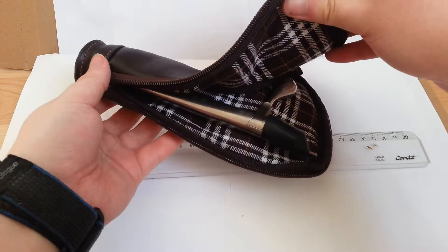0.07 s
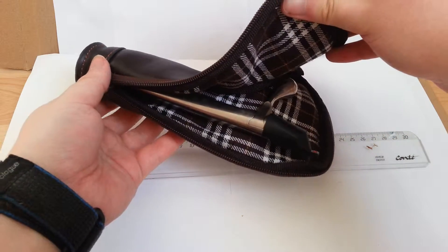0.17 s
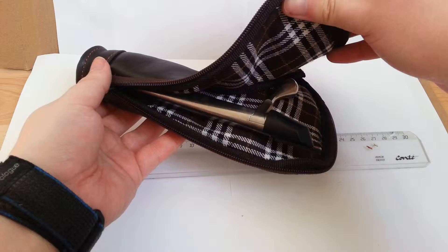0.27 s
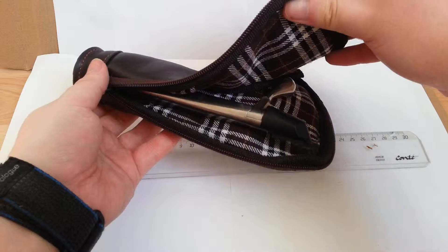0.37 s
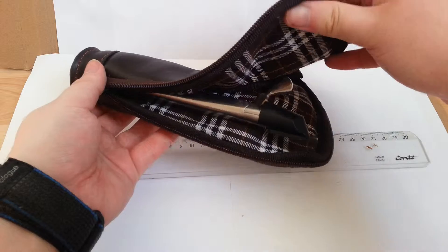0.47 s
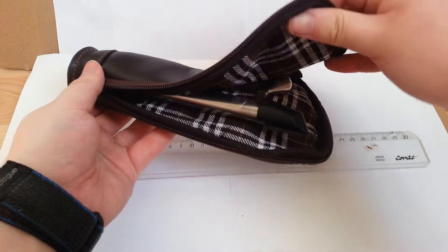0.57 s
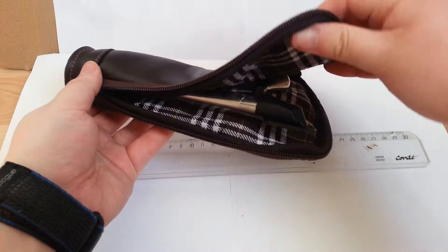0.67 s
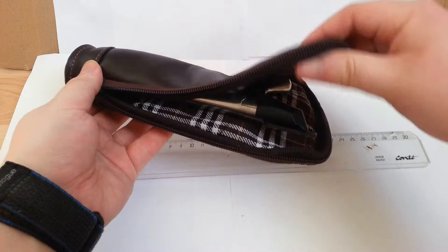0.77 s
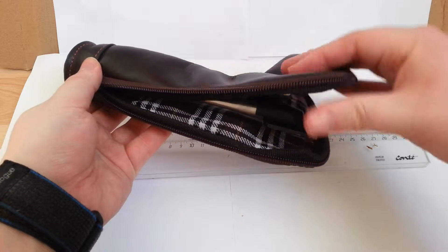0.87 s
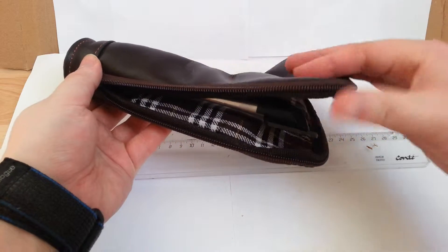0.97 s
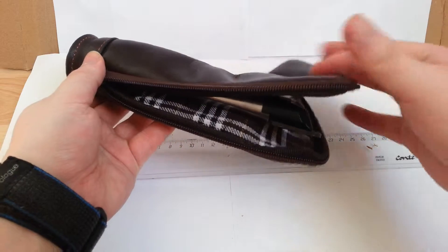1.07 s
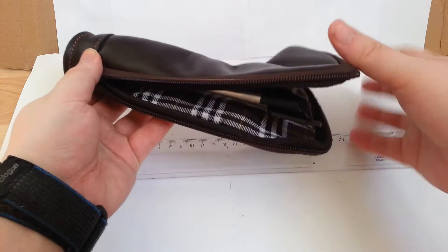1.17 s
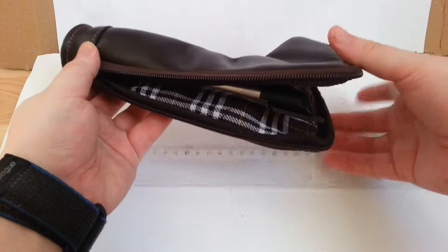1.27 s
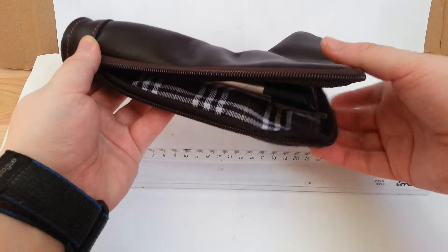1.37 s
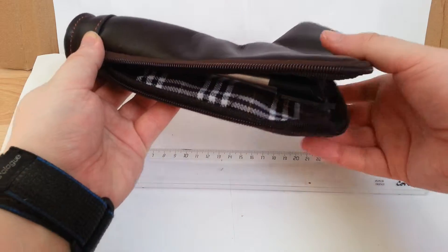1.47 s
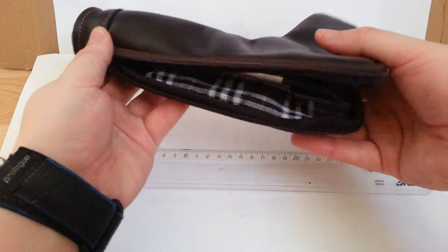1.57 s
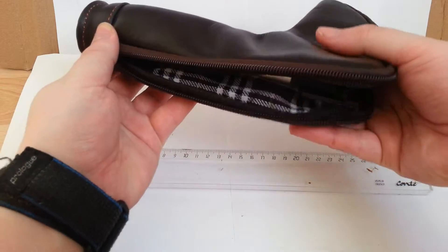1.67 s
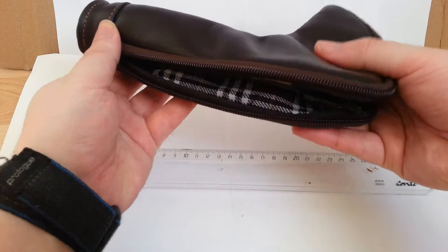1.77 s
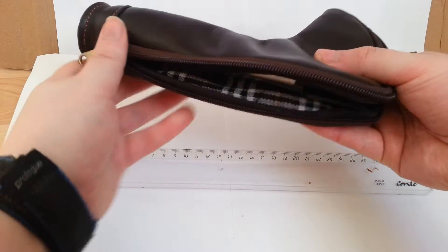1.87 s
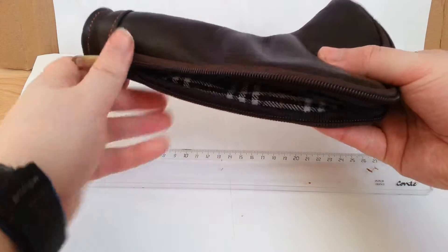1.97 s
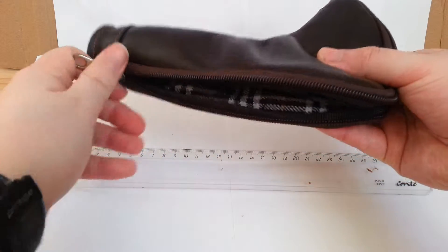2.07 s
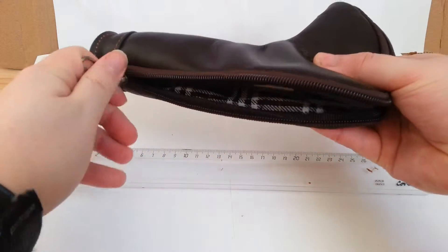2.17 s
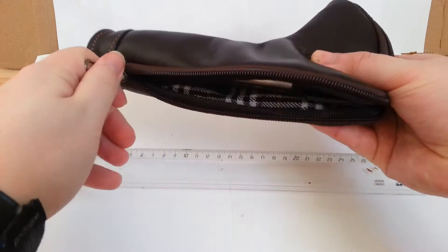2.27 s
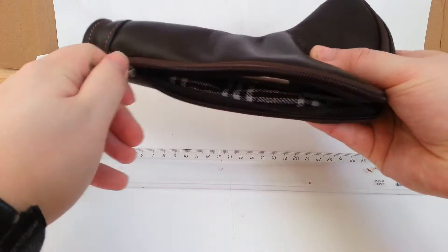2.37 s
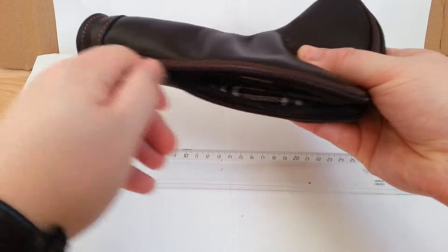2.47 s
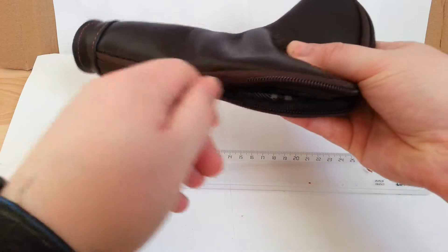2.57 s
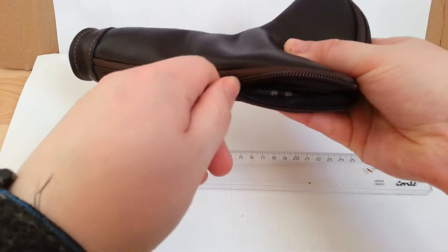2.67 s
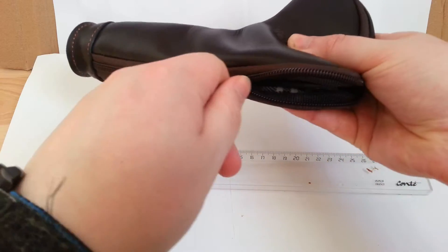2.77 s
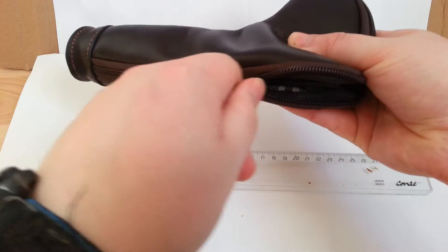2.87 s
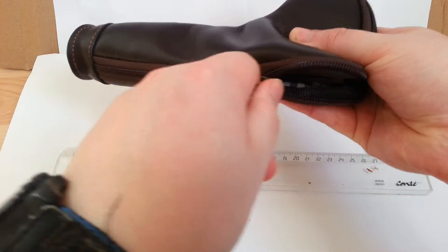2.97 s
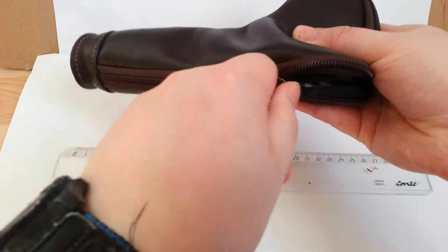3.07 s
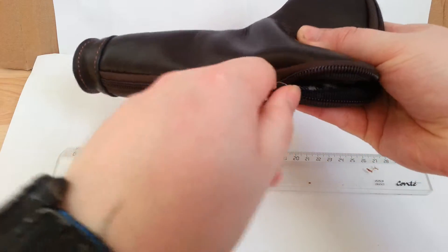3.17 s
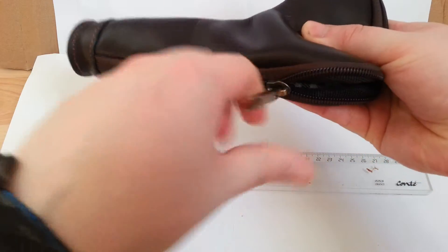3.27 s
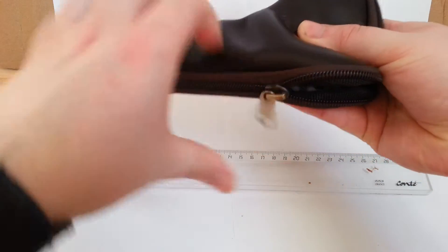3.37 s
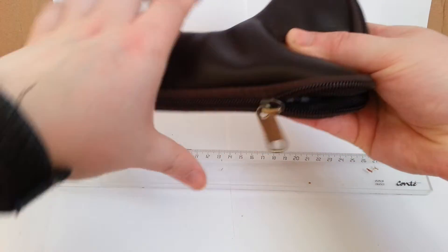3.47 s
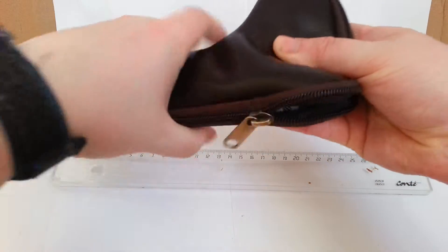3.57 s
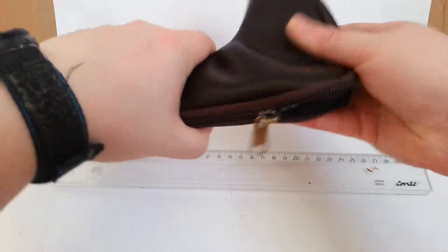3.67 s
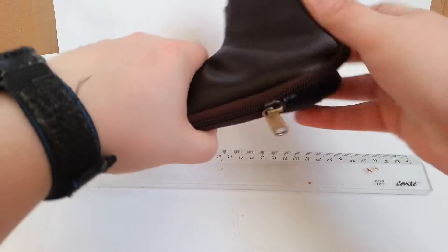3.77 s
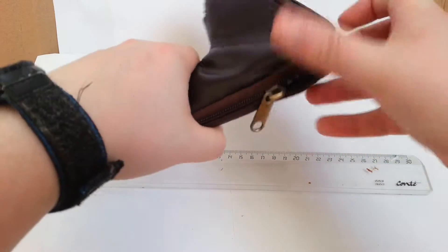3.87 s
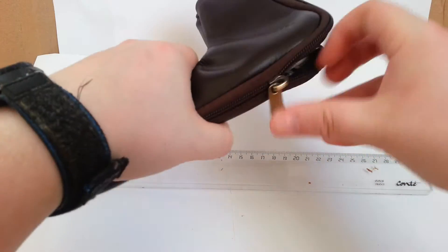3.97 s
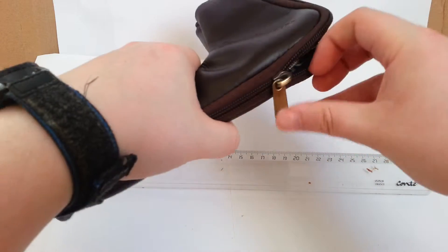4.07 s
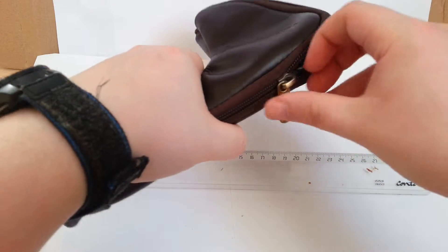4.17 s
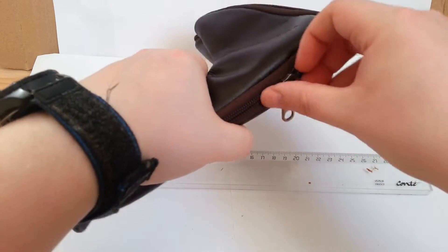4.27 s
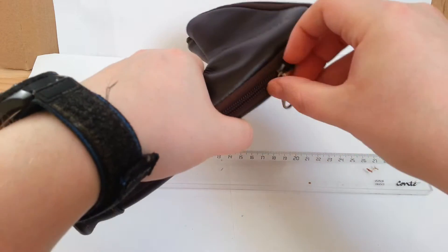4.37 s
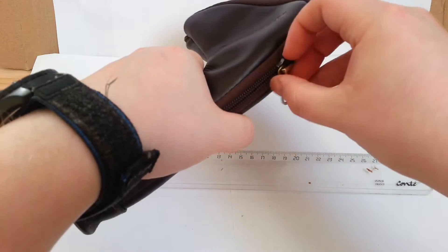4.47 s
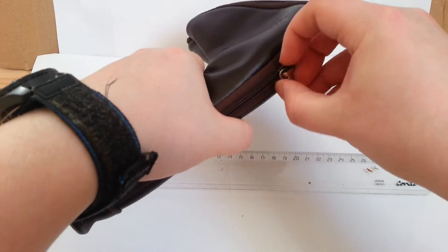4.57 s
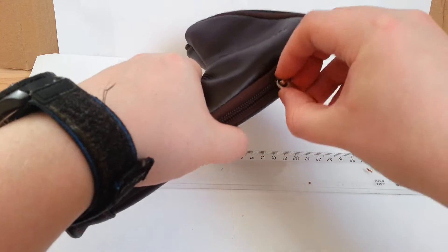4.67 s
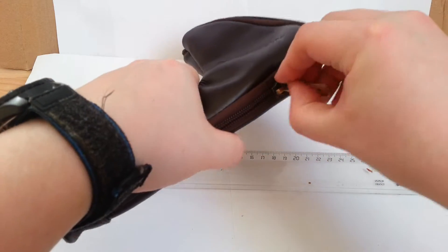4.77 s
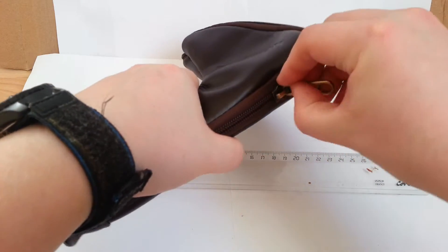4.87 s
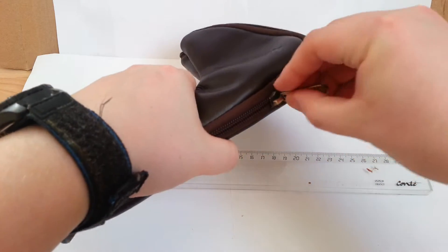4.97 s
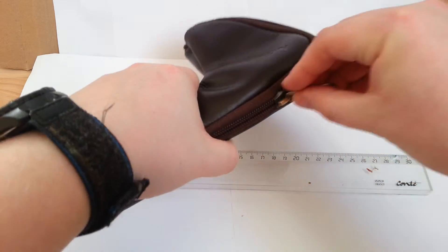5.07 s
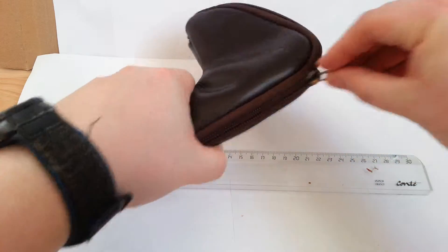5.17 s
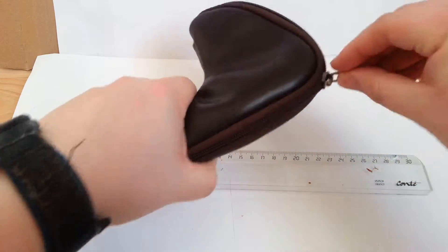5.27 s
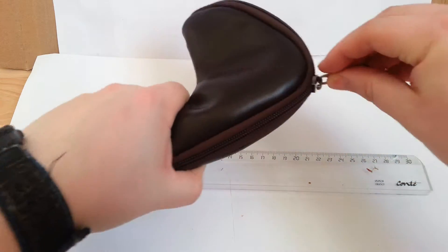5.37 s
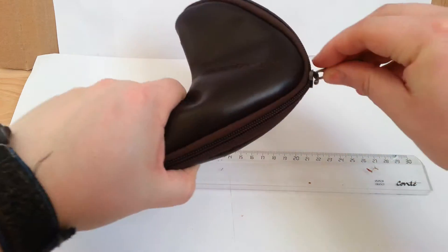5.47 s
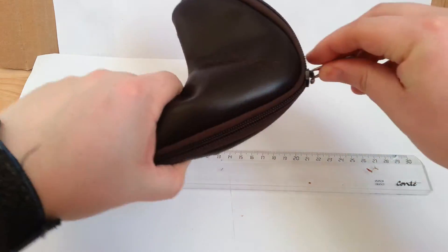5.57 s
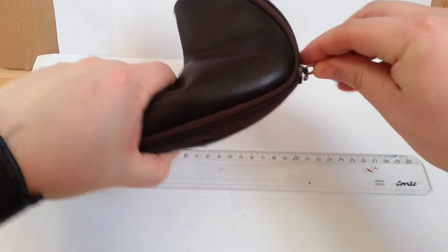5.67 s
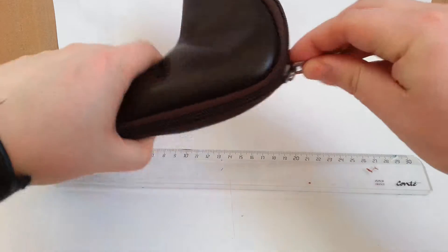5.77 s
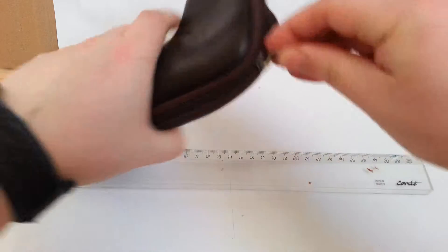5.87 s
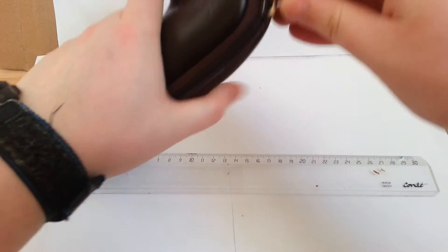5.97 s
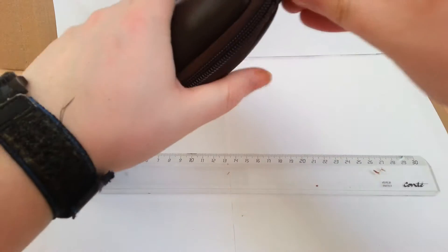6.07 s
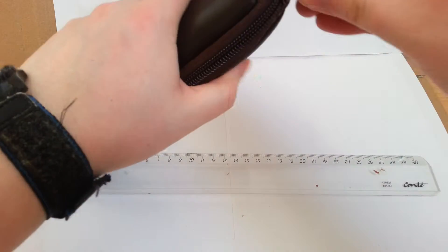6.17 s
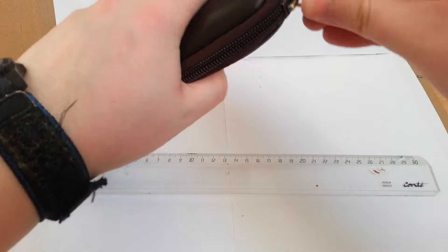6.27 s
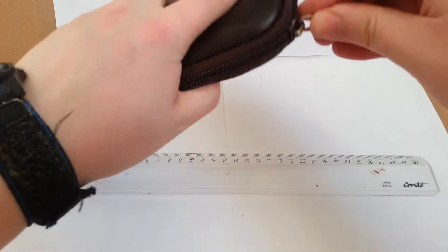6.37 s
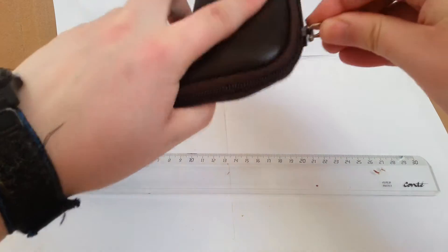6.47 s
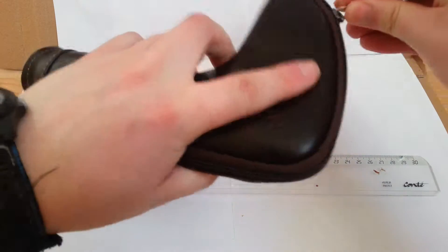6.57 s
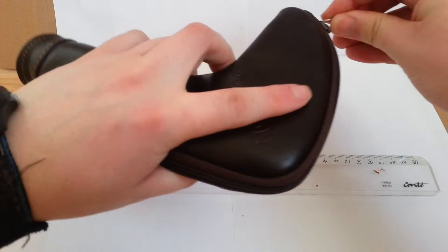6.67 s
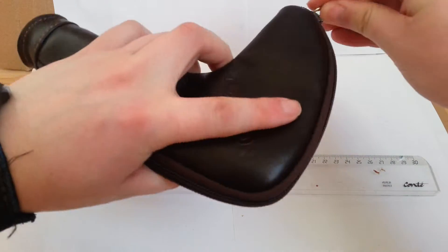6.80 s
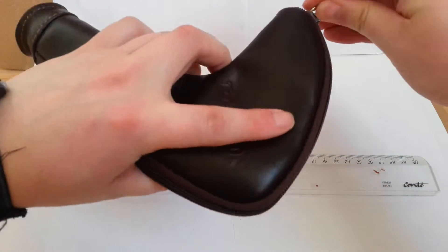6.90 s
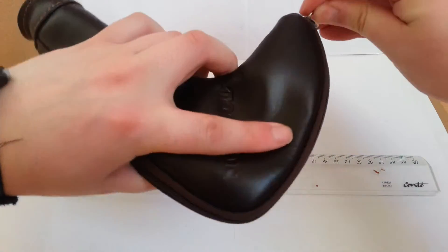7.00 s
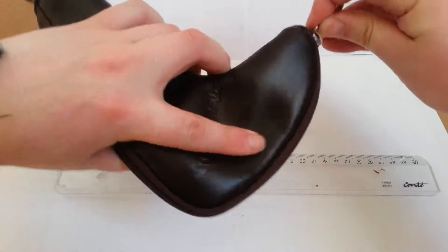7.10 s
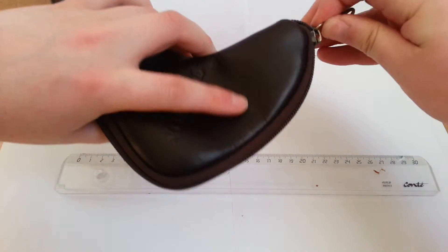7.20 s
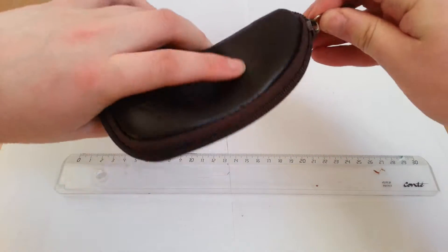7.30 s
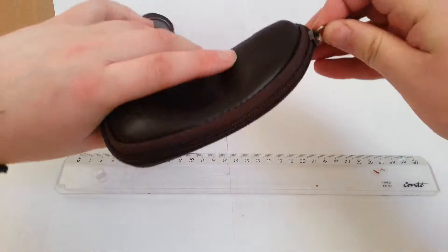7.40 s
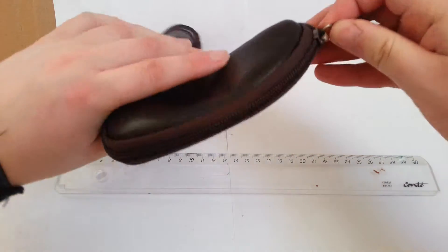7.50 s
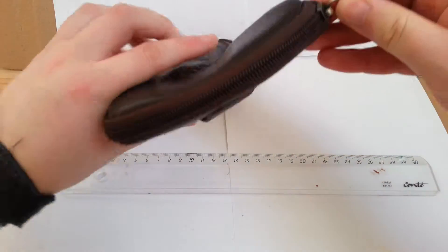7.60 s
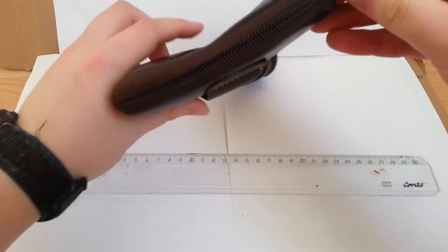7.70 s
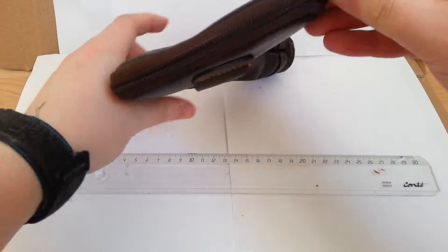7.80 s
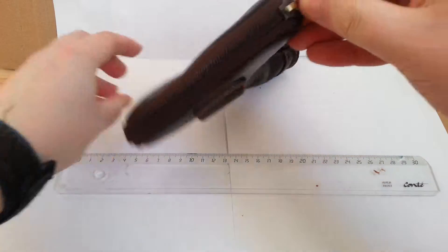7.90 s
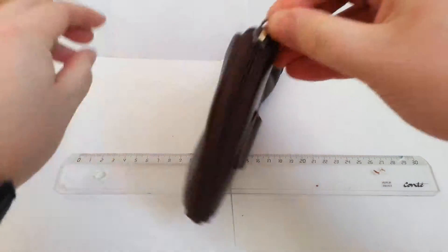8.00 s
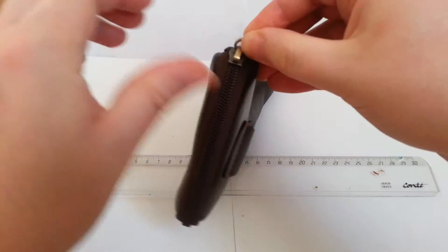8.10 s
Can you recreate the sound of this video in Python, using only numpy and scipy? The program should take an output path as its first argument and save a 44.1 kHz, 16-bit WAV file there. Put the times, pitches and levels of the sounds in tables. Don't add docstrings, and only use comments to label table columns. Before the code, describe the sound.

A zipper on a stuffed leather case is pulled shut in three quick rasping strokes, with leather rubbing, creaks and metal tab ticks between.

```python
import sys
import numpy as np
from scipy import signal
from scipy.fft import rfft, irfft, next_fast_len
from scipy.io import wavfile
from scipy.ndimage import uniform_filter1d

SR = 44100
rng = np.random.default_rng(int(sys.argv[2]) if len(sys.argv) > 2 else 0)


def volts(x):
    e = np.asarray(x, float) / 20
    return 10 ** e


def output_pcm(signal):
    pcm = np.clip(np.atleast_2d(signal).T, -1, 1) * 32767
    wavfile.write(sys.argv[1], SR, np.round(pcm).astype(np.int16))


N = 358956

# [f/Hz, density level/dB per Hz]
PORT_NOISE = [(25, -13), (50, -5), (95, 4.5), (170, 1.5), (300, -6.5), (520, -6), (1000, -10),
              (2150, -15.5), (3450, -16.5), (5200, -21.5), (6400, -25), (8600, -20.5), (12000, -19),
              (14600, -22.5)]
PORT_NOISE_DB = -61
WHINE_HZ, WHINE_DB = 11580, -83
NEAR_DB, LEAK_DB, CUTOFF_HZ = 6.0, -31, 14680

# [f/Hz, width/Hz, level/dB]
THUD = [(231, 117, -4.5), (378, 167, -6)]
RING = [(520, 60, -4), (635, 60, -3), (760, 70, -4), (860, 70, 0), (940, 80, -1), (1050, 110, 0),
        (1200, 150, 0), (1330, 120, 0), (1490, 90, -1), (1750, 65, -1.5)]
RASP = [(1974, 260, -1.5), (2550, 280, -4), (2793, 364, -5), (3373, 750, -7.5), (4260, 980, -11)]
HISS = [(4900, 770, 5.5), (7780, 7500, 1.5), (13000, 10500, -6.5)]
# [f/Hz, width/Hz, level/dB]
PAD = [(245, 204, -4), (356, 197, -3.5)]

# [t/s, ring level/dB]
HOLDING = [(0, -69), (.34, -79), (.63, -76), (1.09, -65), (1.65, -71), (1.9, -61), (2.2, -66), (2.75, -75),
           (3.3, -65), (3.87, -62), (4.1, -71), (4.78, -66), (5.1, -76), (5.45, -62), (5.67, -79),
           (7.02, -73), (7.3, -63), (7.6, -76)]
HOLD_THUD_DB, HOLD_RASP_DB, HOLD_HISS_DB = -63, -65, -68
HOLD_THUD_FOLLOWS, HOLD_RASP_FOLLOWS, HOLD_HISS_FOLLOWS = .4, .75, .4
GRIP_OCTAVES = 0.78
GRIP_FOCUS_HZ, GRIP_FOCUS_HZ_PER_DB = 880, 18
# [peak t/s, ring level/dB, 20 dB rise/s, 20 dB fall/s, rasp level/dB re ring]
RUBS = [(1.09, -67, .1, .1, 3), (1.285, -36, .06, .09, -1.5), (2.95, -49, .2, .2, -7),
        (3.055, -52, .05, .07, -3), (3.42, -44, .05, .05, -2), (1.9, -60, .08, .1, 2),
        (3.574, -53, .15, .45, -1), (4.815, -51, .012, .08, -4), (5.83, -60, .25, .05, -2),
        (5.9, -58, .1, .05, 3), (5.843, -46, .02, .15, -8), (6.29, -55, .04, .3, -1),
        (6.8, -43, .045, .15, -11), (7.834, -51, .14, .3, 2.5), (8.094, -42, .07, .06, -4)]
RUB_THUD_DB, RUB_HISS_DB, RUB_HISS_FOLLOWS = -8, -55, .75
# [peak t/s, ring level/dB, 20 dB rise/s, 20 dB fall/s, rasp level/dB re ring]
GRABS = [
    (1.258, -38.5, .011, .07, 0),
    (4.803, -46, .015, .035, -12),
    (5.929, -37.5, .008, .1, -6),
    (6.005, -52, .06, .16, 4),
    (7.632, -49, .025, .13, 1),
    (7.7, -49, .05, .15, 0),
]
GRAB_THUD_DB, GRAB_HISS_DB, GRAB_HISS_FOLLOWS = 1.5, -49, .3

# [t/s, peak level/dB, ring f/Hz]
SLIPS = [(1.24, -45, 657), (1.605, -48.5, 1060), (1.856, -45, 816), (1.898, -42, 1030),
         (1.986, -45.5, 1320), (2.039, -42, 993), (2.084, -49, 920), (2.138, -53, 905),
         (2.221, -47.5, 1180), (2.848, -38, 854), (2.878, -40.5, 896), (2.888, -45, 1270),
         (2.908, -37, 832), (2.925, -38, 890), (2.943, -38, 912), (2.952, -39, 1260), (2.96, -37, 853),
         (2.978, -39, 1410), (3.041, -46, 1250), (3.062, -49, 1250), (3.373, -44, 651), (3.401, -44, 794),
         (3.625, -48, 1250), (3.705, -46.5, 1450), (5.488, -49, 790), (5.506, -49, 1300),
         (6.267, -48, 1300), (6.371, -46.5, 580)]
SLIP_T60_S, SLIP_CRACK_DB, SLIP_DULLS, SLIP_THUMP_DB = .018, -16, .4, -19
# [t/s, peak level/dB, ring f/Hz, thump level/dB re peak]
KNOCKS = [(1.255, -29, 1150, -6), (2.807, -46.5, 1270, -4), (4.438, -46.5, 785, -4), (5.841, -36, 760, -22),
          (5.928, -28, 1700, 4), (6.775, -35, 807, -14), (6.782, -35, 832, -13), (6.789, -28.5, 780, -17),
          (6.8, -33, 1360, 1), (6.812, -36, 1450, 2), (6.826, -30.5, 860, -30), (7.238, -47.5, 830, -6),
          (7.628, -36.5, 1200, 2.5), (7.702, -51, 1530, -1)]
KNOCK_T60_S, KNOCK_CRACK_DB, KNOCK_DULLS = .017, -17, 1.3
# [t/s, peak level/dB, ring f/Hz, T60/s, crack level/dB re peak]
TAB = [(3.318, -44, 2540, .029, -3.5), (3.417, -37, 1220, .026, -8), (3.671, -40.5, 1850, .017, -7),
       (3.689, -42.5, 2040, .028, -5), (3.761, -46.5, 1810, .032, -2), (3.888, -47, 1210, .014, -3),
       (4.531, -52, 3300, .014, -8), (4.579, -46, 1600, .02, 1.5), (4.791, -45, 1300, .015, -2),
       (4.801, -38.5, 560, .011, 5), (5.547, -53, 4000, .02, -10), (5.83, -43, 2000, .02, -6),
       (5.994, -36, 4600, .014, -20), (6.003, -27, 4650, .03, -23), (6.014, -39, 4700, .1, -23),
       (7.701, -45, 5200, .04, -25), (8.028, -42, 1480, .013, -5)]
TAB_THUMP_DB = -20

# [t/s, ring level/dB, teeth rate/(1/s), ring focus f/Hz, scrape level/dB re ring]
STROKE_1 = [
    (2.366, -36, 128, 1130, -6.5),
    (2.438, -31.5, 125, 1200, -14),
    (2.458, -34, 177, 1190, -15),
    (2.48, -31, 235, 930, -10.5),
    (2.51, -39, 296, 1130, -5),
    (2.575, -33.5, 312, 1020, -7.5),
    (2.63, -38.5, 286, 1070, -8),
    (2.69, -45.5, 293, 900, -10),
    (2.73, -58, 264, 800, -7),
]
# [t/s, ring level/dB, teeth rate/(1/s), ring focus f/Hz, scrape level/dB re ring]
STROKE_2 = [
    (5.116, -70, 247, 1020, -10),
    (5.13, -52, 249, 1050, -4.5),
    (5.165, -44.5, 265, 1000, -5.5),
    (5.2, -41, 280, 560, -8),
    (5.22, -45.5, 253, 673, -4.5),
    (5.252, -47.5, 198, 820, -6),
    (5.294, -51, 195, 858, -3.5),
    (5.34, -62, 160, 817, -2),
]
# [t/s, ring level/dB, teeth rate/(1/s), ring focus f/Hz, scrape level/dB re ring]
STROKE_3 = [
    (6.447, -56, 194, 670, -3),
    (6.49, -31.5, 220, 700, -9.5),
    (6.52, -25.5, 254, 980, -11.5),
    (6.558, -21.5, 316, 1080, -18.5),
    (6.588, -23.5, 430, 1420, -15),
    (6.615, -25, 437, 1240, -20.5),
    (6.645, -33.5, 300, 1401, -19),
    (6.685, -34.5, 116, 975, -8),
    (6.752, -53, 190, 1600, -11),
]
SCRAPE_PER_DB = .015
THUD_FOLLOWS = .7
HISS_PER_OCTAVE_DB, UPPER_RASP_PER_OCTAVE_DB = 3, 3

# [t/s, lower f/Hz, lower level/dB, upper level/dB]
SLIDE = [
    (7.692, 4250, -74, -74),
    (7.703, 4250, -61, -55),
    (7.722, 4200, -65, -67),
    (7.83, 4130, -59, -68),
    (7.9, 3950, -65, -68),
    (7.96, 3880, -72, -72),
]
SLIDE_UPPER_HZ, SLIDE_WIDTH_HZ = 5180, 100


def rms_one(x):
    return x / np.sqrt(np.mean(x ** 2) + 1e-20)


def in_time(rows):
    s, *columns = np.transpose(rows)
    t = np.arange(N) / SR
    gate = np.interp(t, [s[0] - .006, s[0], s[-1], s[-1] + .006], [0, 1, 1, 0])
    return [np.interp(t, s, c) for c in columns] + [gate]


def band(x, low_hz, high_hz):
    return signal.sosfilt(signal.butter(3, [low_hz, high_hz], "band", fs=SR, output="sos"), x)


def resonate(x, modes):
    out, power = 0, 0
    for k, (hz, width_hz, db) in enumerate(modes):
        r = np.exp(-np.pi * width_hz / SR)
        gain = (1 - r * r) / 2
        poles = [1, -2 * r * np.cos(2 * np.pi * hz / SR), r * r]
        mode = signal.lfilter(np.array([1, 0, -1]) * gain, poles, x + 1e-18)
        out = out + (-1) ** k * volts(db) * mode
        power += volts(db) ** 2 * gain
    return out / np.sqrt(power)


def floor():
    size = next_fast_len(N)
    hz = np.maximum(np.fft.rfftfreq(size, 1 / SR), 1)
    table_hz, table_db = np.transpose(PORT_NOISE)
    shape = volts(np.interp(np.log(hz), np.log(table_hz), table_db))
    spectrum = rfft(rng.standard_normal((2, size))) * shape
    noise = rms_one(irfft(spectrum, size)[:, :N])
    whine = volts(WHINE_DB) * resonate(rng.standard_normal(N), [(WHINE_HZ, 40, 0)])
    return volts(PORT_NOISE_DB + 3) * noise + whine * [[1], [0]]


def opening(x, shut_db, range_db, fall_db_s):
    level = 10 * np.log10(uniform_filter1d(x ** 2, size=441) + 1e-12)
    sink = fall_db_s * np.arange(N) / SR
    held = np.maximum.accumulate(np.minimum(level, shut_db + range_db) + sink) - sink
    return uniform_filter1d(np.clip((held - shut_db) / range_db, 0, 1), size=882)


def case(knock, scrape, thud_modes, octaves, ring_db, thud_db, rasp_db, hiss_db, focus_hz, upper_db=0):
    distance = np.log2(np.array(RING)[:, :1]) - np.log2(focus_hz)
    share = np.exp(-.5 * (distance / octaves) ** 2)
    share += .1
    share *= volts(ring_db) / np.sqrt(np.sum(share ** 2, axis=0))
    ring = 0
    for k, (hz, width_hz, db) in enumerate(RING):
        ring = ring + (-1) ** k * volts(db) * resonate(knock * share[k], [(hz, width_hz, 0)])
    thud = band(resonate(knock * volts(thud_db), thud_modes), 148, 572)
    lower = resonate(scrape * volts(rasp_db), RASP[:3])
    upper = resonate(scrape * volts(rasp_db + upper_db), RASP[3:])
    rasp = band(.81 * lower - .58 * upper, 1860, 4400)
    hiss = band(resonate(scrape * volts(hiss_db), HISS), 5660, 19000)
    return band(ring, 356, 2210) + thud + rasp + hiss


def grains(per_s, spread_db):
    sizes = volts(spread_db * np.minimum(rng.exponential(1, N), 4)) * rng.choice([-1, 1], N)
    return rms_one(sizes * (rng.random(N) < per_s / SR))


def hand_levels():
    t = np.arange(0, N + 32, 32) / SR
    hold = np.interp(t, *np.transpose(HOLDING)) + 65
    grip_db = np.array([hold - 65,
                        HOLD_THUD_DB + HOLD_THUD_FOLLOWS * hold,
                        HOLD_RASP_DB + HOLD_RASP_FOLLOWS * hold,
                        HOLD_HISS_DB + HOLD_HISS_FOLLOWS * hold])
    power = volts(2 * grip_db)
    moves = []
    for row in RUBS:
        moves.append((row, RUB_THUD_DB, RUB_HISS_DB + RUB_HISS_FOLLOWS * (row[1] + row[4] + 50)))
    for row in GRABS:
        moves.append((row, GRAB_THUD_DB + row[4] / 2, GRAB_HISS_DB + GRAB_HISS_FOLLOWS * (row[1] + 45)))
    for (s, db, rise_s, fall_s, bright_db), thud_db, hiss_db in moves:
        shape_db = -20 * np.maximum((s - t) / rise_s, (t - s) / fall_s)
        peaks_db = np.array([[db], [db + thud_db], [db + bright_db], [hiss_db]])
        power = power + volts(2 * (shape_db + peaks_db))
    levels = 10 * np.log10(power)
    focus_hz = GRIP_FOCUS_HZ + GRIP_FOCUS_HZ_PER_DB * (levels[2] + 65)
    return in_time(np.transpose([t, *levels, focus_hz]))[:-1]


def handling():
    free = 1 - sum(in_time(table)[-1] for table in (STROKE_1, STROKE_2, STROKE_3))
    friction = free * rng.standard_normal(N)
    creak = free * grains(per_s=700, spread_db=4.0)
    low, bright = 0.74 * friction + 0.95 * creak, 0.88 * friction + 0.5 * creak
    return case(low, bright, PAD, GRIP_OCTAVES, *hand_levels())


def contacts():
    blows = []
    for s, db, hz in SLIPS:
        blows.append((s, db, hz, SLIP_T60_S, SLIP_CRACK_DB - SLIP_DULLS * (db + 45), SLIP_THUMP_DB))
    for s, db, hz, thump_db in KNOCKS:
        blows.append((s, db, hz, KNOCK_T60_S, KNOCK_CRACK_DB - KNOCK_DULLS * (db + 45), thump_db))
    return blows + [(*row, TAB_THUMP_DB) for row in TAB]


def ticks():
    out, t = np.zeros(N + 3000), np.arange(3000) / SR
    for s, db, hz, t60, crack_db, thump_db in contacts():
        rattle = rng.standard_normal(3000) * volts(-60 * t / np.clip(t60, .003, .1))
        blow = 0.38 * rattle + 1.67 * (t == 0)
        body = .4 * resonate(blow, RING) + .6 * resonate(blow, [(hz, .5 * hz, 0)])
        body = band(body, 246, 2 * hz) + volts(crack_db + 8) * resonate(blow, RASP)
        treble = np.clip(volts(crack_db), .2, .9) * band(rattle, 5500, 16000)
        crack = volts(crack_db - 3) * (band(rattle, 2500, 5500) + treble)
        swell = volts(-60 * t / 0.021) * (1 - np.exp(-t / 0.0026))
        thump = volts(thump_db) * np.sin(2 * np.pi * 345 * t) * swell
        at = round(s * SR)
        out[at:at + 3000] += volts(db + 3.0) * (body / np.abs(body).max() + crack + thump)
    return out[:N]


def stroke(table, jitter, uneven_db, burr_s, thud_db, thud_per_octave_db, hiss_db, scrape, octaves, widen,
           upper_db):
    ring_db, per_s, focus_hz, loose_db, gate = in_time(table)
    speed = np.log2(per_s / 200)
    force_db = ring_db + 40
    scrape = np.clip(scrape - SCRAPE_PER_DB * force_db, .05, .9)
    octaves = np.clip(octaves + widen * speed, .15, 1)
    thud_db = thud_db + THUD_FOLLOWS * np.minimum(force_db, 0) + thud_per_octave_db * speed
    chance = rng.standard_normal((400, 2))
    teeth_passed = np.cumsum(per_s * gate) / SR
    at = np.searchsorted(teeth_passed, np.arange(2, 402) / 2 + jitter * chance[:, 0])
    knocks = np.zeros(N + 1)
    knocks[at] = volts(uneven_db * chance[:, 1])
    facing = at[1::2]
    knocks[facing] *= np.clip(np.append(per_s, 0)[facing] / 170 - 2, 0, 1)
    knocks = knocks[:N] * np.sqrt(SR / per_s)
    fade = np.exp(-1 / (burr_s * SR))
    burr = signal.lfilter([np.sqrt(1 - fade ** 2)], [1, -fade], knocks) * rng.standard_normal(N)
    low = np.sqrt(1 - scrape) * knocks + np.sqrt(scrape) * burr
    bright = .4 * (1 - scrape) * knocks + .9 * burr
    rasp_db = ring_db + loose_db
    hiss_db = rasp_db + hiss_db + HISS_PER_OCTAVE_DB * speed
    upper_db = upper_db + UPPER_RASP_PER_OCTAVE_DB * speed
    return case(low, bright, THUD, octaves, ring_db, thud_db, rasp_db, hiss_db, focus_hz, upper_db)


def slide():
    lower_hz, lower_db, upper_db, gate = in_time(SLIDE)
    slow = signal.butter(2, SLIDE_WIDTH_HZ, fs=SR, output="sos")
    wobble = rms_one(signal.sosfilt(slow, rng.standard_normal((2, N))))
    turns = np.array([np.cumsum(lower_hz), np.arange(N) * SLIDE_UPPER_HZ]) / SR
    whistles = volts(np.array([lower_db, upper_db]) + 3) * wobble * np.sin(2 * np.pi * turns)
    return gate * np.sum(whistles, axis=0)


def scene():
    zip_pull = stroke(STROKE_1, jitter=.04, uneven_db=2.0, burr_s=.004, thud_db=-46.5,
                      thud_per_octave_db=-2.5, hiss_db=-8.5, scrape=.35, octaves=.4, widen=.25, upper_db=-3)
    zip_pull += stroke(STROKE_2, jitter=0.034, uneven_db=-1.5, burr_s=0.0082, thud_db=-49,
                       thud_per_octave_db=-4, hiss_db=-10, scrape=.35, octaves=.7, widen=-.1, upper_db=-3)
    zip_pull += stroke(STROKE_3, jitter=0.04, uneven_db=3.5, burr_s=0.0066, thud_db=-48.5,
                       thud_per_octave_db=-4.5, hiss_db=-13, scrape=.38, octaves=.43, widen=.04, upper_db=-4.5)
    near = volts(NEAR_DB) * (zip_pull + handling() + slide() + ticks())
    leak = volts(LEAK_DB) * band(np.concatenate([np.zeros(5), near[:-5]]), 130, 1400)
    opened = opening(near, shut_db=-67, range_db=21, fall_db_s=88)
    noise = floor()
    rumble = signal.sosfiltfilt(signal.butter(2, 140, fs=SR, output="sos"), noise)
    swollen = volts(opened * [[6.5], [2.5]]) * (noise - rumble) + volts(opened * [[3.5], [-5.0]]) * rumble
    return np.array([leak, near]) + swollen


def band_limit(x):
    return signal.sosfilt(signal.butter(12, 15660, fs=SR, output="sos"), x)


def record(dry):
    steep = signal.ellip(12, .5, 60, CUTOFF_HZ, fs=SR, output="sos")
    mix = signal.sosfilt(steep, dry)
    return band_limit(mix)


dry = scene()
out = record(dry)
output_pcm(out)
```